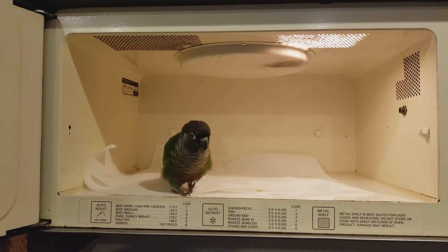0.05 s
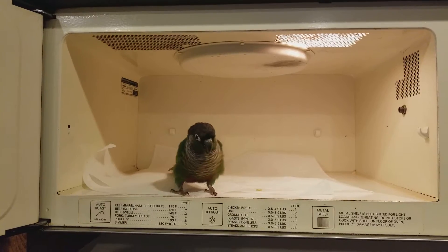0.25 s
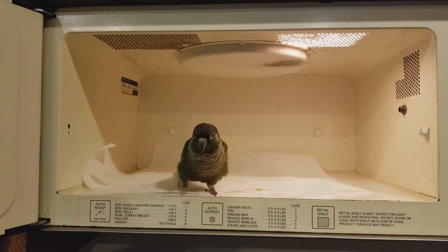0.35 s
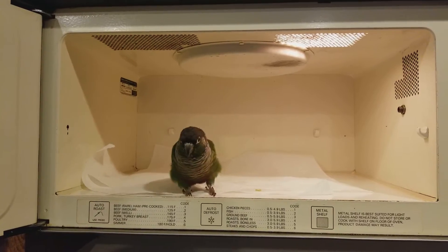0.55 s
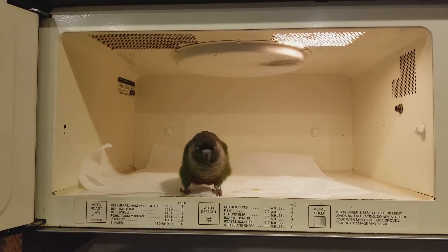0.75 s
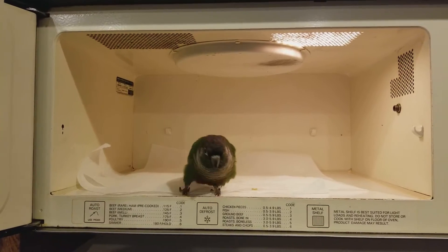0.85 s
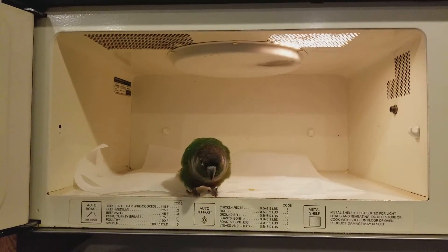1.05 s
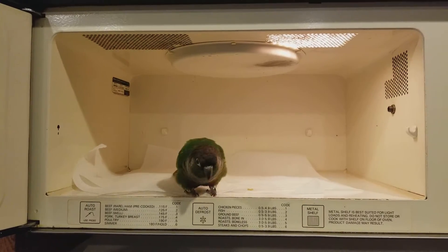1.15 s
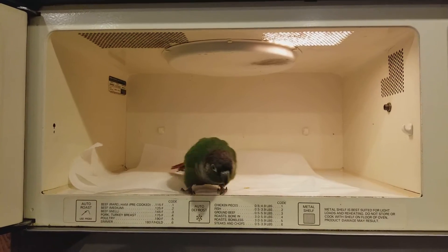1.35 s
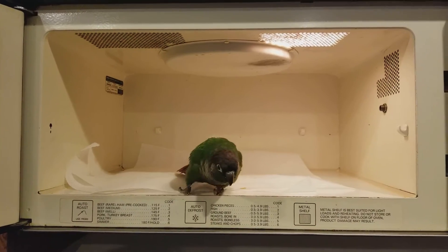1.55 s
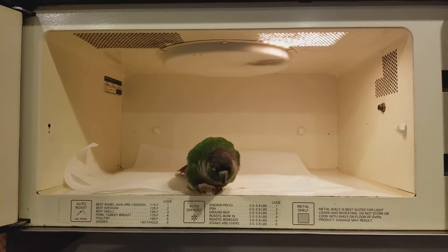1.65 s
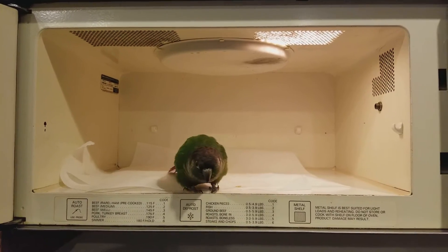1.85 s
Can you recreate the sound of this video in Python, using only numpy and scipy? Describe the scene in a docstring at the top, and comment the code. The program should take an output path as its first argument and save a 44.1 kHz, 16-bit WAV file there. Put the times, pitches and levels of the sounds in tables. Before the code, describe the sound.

Close to the microphone, a small bird shuffles in an open, paper-lined microwave: two quick claw scratches, two hollow thumps, then fainter steps. Behind it, a quiet room holds a faint hum and dull, gently swelling noise.

```python
"""Claws brush twice on paper, close by: a small bird shifts about in an open, paper-lined microwave oven.
Each foot then thumps the hollow floor and rings its modes; soft shuffling steps follow.
The metal cavity rings briefly after brushes and steps. Behind the bird, the stereo microphone hears
a quiet room throughout: a faint hum and a dull noise whose midrange gently swells."""
import sys
import numpy as np
from scipy import signal
from scipy.fft import rfft, irfft
from scipy.io import wavfile

SR = 44100
rng = np.random.default_rng(int(sys.argv[2]) if len(sys.argv) > 2 else 0)


def output_pcm(signal):
    """Save a mono or channel-first signal as 16-bit PCM at the path in sys.argv[1].

    Samples are clipped to [-1, 1] before scaling.
    """
    pcm = np.clip(np.atleast_2d(signal).T, -1, 1) * 32767
    wavfile.write(sys.argv[1], SR, np.round(pcm).astype(np.int16))


N = 83790
TIME_S, BIN_HZ = np.arange(N) / SR, np.fft.rfftfreq(N, 1 / SR)

# likeness of diffuse sound at the two sides of the microphone: frequency_hz, coherence
COHERENCE = [(50, 0.95), (250, 0.9), (500, 0.65), (1000, -0.11), (4000, -0.029)]
# how far each band of the background follows the swell: frequency_hz, share
SWELL_SHARE = [(150, 0.078), (700, 0.017), (1600, 0.59), (2100, 0.42), (2500, 1), (3200, 0.85),
               (4200, 0.13)]


def amp(db):
    """Decibels to gain."""
    return 10 ** (np.asarray(db) / 20)


def unit_rms(x):
    """Scales to rms 1."""
    return x / np.sqrt(np.mean(x ** 2) + 1e-20)


def read(points, hz):
    """Reads a table on a log-frequency axis."""
    f, value = np.transpose(points)
    return np.interp(np.log(hz + 1), np.log(f + 1), value)


def add(mix, start_s, sound):
    """Mixes a sound in from start_s on."""
    part = mix[..., max(round(start_s * SR), 0):][..., :sound.shape[-1]]
    part += sound[..., :part.shape[-1]]


def colour(x, points):
    """Shapes a signal by a spectrum, to rms 1."""
    return unit_rms(irfft(rfft(x) * amp(read(points, BIN_HZ)), N))


def decay(t, t60):
    """Exponential decay, 60 dB in t60."""
    return np.exp(-np.log(1000) * t / t60)


def diffuse_noise():
    """Left and right noise, alike in the bass and unrelated in the treble."""
    a, b = rfft(rng.standard_normal((2, N)))
    coherence = read(COHERENCE, BIN_HZ)
    mid, side = a * np.sqrt((1 + coherence) / 2), b * np.sqrt((1 - coherence) / 2)
    return irfft(np.array([mid + side, mid - side]), N)


def claw_brushes(snaps_per_s=16000, spread_db=2.0, coherence=0.055, pivot_hz=5000, ring_db=0.5):
    """Claws catch on paper fibres: dense tiny snaps under each quick stroke."""
    # claw strokes: start_s, level_db, rise_s, fade_s, tilt_db_per_octave
    strokes = [(0, -64.5, 0.0011, 0.028, 3), (0.079, -51.8, 0.017, 0.011, -1),
               (0.123, -44.5, .016, 0.0077, 0.8), (.160, -62.5, 0.025, 0.024, 3),
               (0.239, -58.5, 0.0095, 0.015, -5.5), (0.314, -70.5, 0.0069, 0.019, -4),
               (0.404, -65, 0.0091, 0.016, -9.5), (.442, -65.5, 0.007, 0.0071, 0),
               (.672, -74, 0.0088, 0.028, -2), (1.012, -75.5, 0.0078, 0.026, -1),
               (1.305, -78.5, 0.01, 0.02, 5)]
    # colour of the paper at each side of the microphone: frequency_hz, relative_db
    paper_left = [(400, -9.5), (2500, 3), (4000, -3.5), (5500, -1.5), (6500, 2), (7200, 0), (8500, -10),
                  (10500, -7.5), (12800, -4), (14000, -9), (15700, -18)]
    paper_right = [(400, -11), (2500, 3.5), (4000, -5.5), (5400, -3), (5950, 5), (7100, -8.5), (9000, -6.5),
                   (10500, -11), (12500, -11), (14300, -13), (15700, -40)]
    snaps = rng.standard_normal((3, N))  # left, right, common to both
    snaps *= amp(spread_db * np.minimum(rng.exponential(1, N), 4))
    snaps *= rng.random(N) < snaps_per_s / SR
    left, right = np.sqrt(coherence) * snaps[2] + np.sqrt(1 - coherence) * snaps[:2]
    paper = rfft(np.array([colour(left, paper_left), colour(right, paper_right)]))
    octaves = np.log2(np.maximum(BIN_HZ, 1000) / pivot_hz)
    direct = np.zeros((2, N))
    for start_s, level_db, rise_s, fade_s, tilt in strokes:
        rise = np.clip((TIME_S - start_s) / rise_s, 0, 1) ** 2
        fade = np.exp(-np.maximum(TIME_S - start_s - rise_s, 0) / fade_s)
        direct += amp(level_db) * rise * fade * irfft(paper * amp(tilt * octaves), N)
    return direct + amp(ring_db) * cavity_ring(direct)


def cavity_ring(x, build_s=0.0072):
    """The metal box and the room ring diffusely, longest in the bass."""
    # ring time of cavity and room: frequency_hz, t60_s
    ring_times = [(100, 0.73), (1200, 0.4), (12000, 0.17)]
    hz, t, spectra = signal.stft(diffuse_noise(), SR, nperseg=256)
    spectra *= decay(t, read(ring_times, hz)[:, None])
    tail = signal.istft(spectra, SR, nperseg=256)[1][:, :SR // 2]
    tail *= np.minimum(TIME_S[:SR // 2] / build_s, 1)
    return signal.fftconvolve(x, tail / np.linalg.norm(tail[0]), axes=1)[:, :N]


def swell_db(t, period_s=0.539, dip_s=0.741, depth_db=8):
    """The background's midrange swells in even, round arches that average 0 dB."""
    return depth_db * (abs(np.sin(np.pi * (t - dip_s) / period_s)) - 2 / np.pi)


def hum(waver_rad=0.19, waver_ref_hz=100):
    """Faint lasting tones; the higher ones waver more and reach the two sides out of step."""
    # tones of the hum, before the swell: pitch_hz, rms_db
    tones = [(40.7, -66), (81.2, -60.5), (120, -70), (204.6, -66.5), (409.1, -78), (1588, -72), (1992, -74)]
    out, drift_hz = np.zeros((2, N)), np.geomspace(.4, 8, 12)
    for hz, rms_db in tones:
        drift = sum(np.sin(2 * np.pi * (f * TIME_S + rng.random())) / np.sqrt(f) for f in drift_hz)
        waver = waver_rad * np.sqrt(hz / waver_ref_hz) * unit_rms(drift)
        side_phase = np.arccos(read(COHERENCE, hz)) * np.array([[.5], [-.5]])
        peak = np.sqrt(2) * amp(rms_db + read(SWELL_SHARE, hz) * swell_db(TIME_S))
        out += peak * np.sin(2 * np.pi * (hz * TIME_S + rng.random()) + waver + side_phase)
    return out


def room_noise(left_db=-53.5, right_db=-54.5):
    """Dull room noise whose midrange swells gently."""
    # colour of the room at each side of the microphone: frequency_hz, relative_db
    room_left = [(20, -19), (98, -1.5), (160, -8), (240, 2), (400, -8), (600, -6.5), (1400, -12),
                 (2000, -15), (2550, -16.5), (2900, -28), (3600, -35.5), (5200, -41.5), (6500, -36),
                 (7300, -41.5), (15500, -39.5)]
    room_right = [(20, -32), (98, 4.5), (160, -14), (240, 1), (400, -7), (600, -9), (1000, -12),
                  (1500, -15.5), (2400, -10.5), (3100, -22), (3600, -35.5), (4800, -41.5), (6150, -31),
                  (7300, -40.5), (15500, -38.5)]
    left, right = diffuse_noise()
    steady = np.array([amp(left_db) * colour(left, room_left), amp(right_db) * colour(right, room_right)])
    hz, t, spectra = signal.stft(steady, SR, nperseg=512)
    spectra *= amp(read(SWELL_SHARE, hz)[:, None] * swell_db(t))
    return signal.istft(spectra, SR, nperseg=512)[1][:, :N]


def footfalls(left_lead_s=0.00019, low_cut_hz=34, rattle_db=1.5, ring_db=-18.5):
    """Each foot rings the floor's modes from its own spot; hard contacts add a dull rattle."""
    # modes of the oven floor and cavity: pitch_hz, t60_s, first_foot_db, second_foot_db
    modes = [(47, .27, -5.5, -21), (65.5, 0.24, -3, -15), (129.8, 0.099, -5.5, -29), (159, 0.28, -29, -8.5),
             (237, 0.14, -4.5, -8.5), (246, 0.12, -15.5, -6.5), (276.5, 0.15, -16.5, 3.5),
             (339.6, 0.24, -10, 5), (368, .15, -8.5, -1.5), (493, 0.13, 0, -13.5), (522, 0.11, -40, 4.5),
             (595.6, 0.23, -14.5, -6.5), (682, .106, -21, -9.5), (773, 0.15, -36, -2.5),
             (834, 0.098, -3.5, -25), (1127, 0.07, -5, -8.5), (1257, 0.086, -31, -5)]
    # toe touches, thumps and shifts of weight: start_s, force_db, foot (0 or 1), contact_s
    steps = [(.012, -36, 0, 0.0057), (0.2437, -44.5, 0, 0.00045), (0.2474, -21.5, 0, 0.0028),
             (0.2627, -56, 0, 0.0028), (0.3012, -37, 0, 0.0098), (0.309, -44, 0, 0.00093),
             (0.3457, -46, 0, 0.0064), (0.4027, -42, 1, 0.0013), (.4073, -33, 1, .0011),
             (0.4235, -33.5, 1, 0.0023), (0.4424, -45.5, 1, 0.00098), (0.458, -46, 1, 0.0025),
             (0.5251, -44, 1, 0.012), (.632, -42, 0, 0.0096), (0.931, -58, 0, 0.0035),
             (1.539, -60, 1, 0.0031)]
    # colour of the lined floor's dense rattle: frequency_hz, relative_db
    rattle_colour = [(20, -36), (100, -12.5), (300, -13), (600, -5.5), (850, -12.5), (1000, -13.5),
                     (1280, -7), (1600, -20), (4000, -34)]
    age = np.maximum(TIME_S + np.array([[.5], [-.5]]) * left_lead_s, 0)
    rings = [np.sin(2 * np.pi * hz * age) * decay(age, t60) for hz, t60, *_ in modes]
    radiation = (1j * BIN_HZ / (low_cut_hz + 1j * BIN_HZ)) ** 2  # a small panel gives little deep bass
    spots = [radiation * rfft(sum(amp(db) * ring for db, ring in zip(foot_db, rings)))
             for foot_db in np.transpose(modes)[2:]]
    rattle_envelope = np.minimum(TIME_S / 0.0043, 1) * decay(TIME_S, t60=0.38)
    thumps, rattle = np.zeros((2, N)), np.zeros((2, N))
    for start_s, force_db, foot, contact_s in steps:
        push = 1 / (1 + 1j * BIN_HZ * contact_s) ** 2  # a long, soft contact leaves out the treble
        add(thumps, start_s, amp(force_db) * irfft(spots[round(foot)] * push, N))
        dulled = irfft(rfft(colour(diffuse_noise(), rattle_colour)) * push ** 2, N)
        add(rattle, start_s, amp(force_db + rattle_db) * dulled * rattle_envelope)
    balance = amp([[.5], [-.5]])  # 1 dB louder on the left
    return (thumps + rattle + amp(ring_db) * cavity_ring(thumps)) * balance


def scene():
    """The bird's feet over the quiet room."""
    return footfalls() + claw_brushes() + hum() + room_noise()


def record(dry):
    """The recorder passes nothing much above 15.7 kHz."""
    low_pass = signal.firwin(511, 15700, window=("kaiser", 9), fs=SR)
    return signal.oaconvolve(dry, low_pass[None], "same")


dry = scene()
out = record(dry)
output_pcm(out)
```